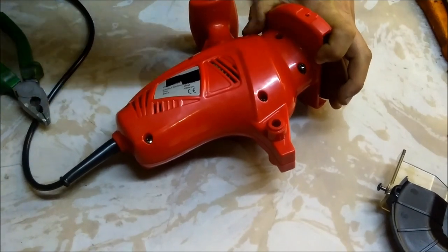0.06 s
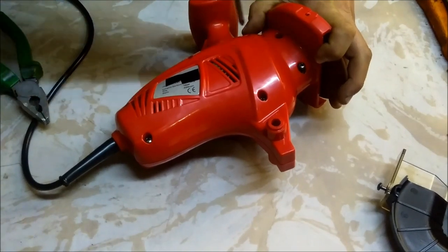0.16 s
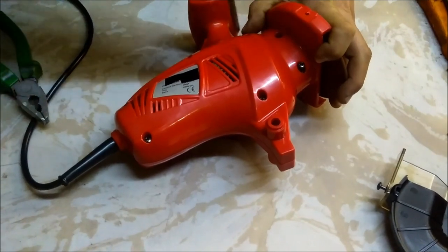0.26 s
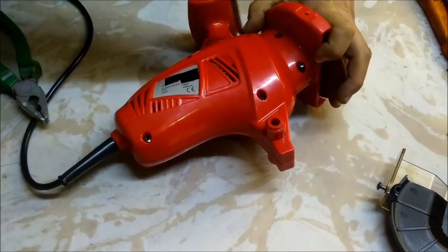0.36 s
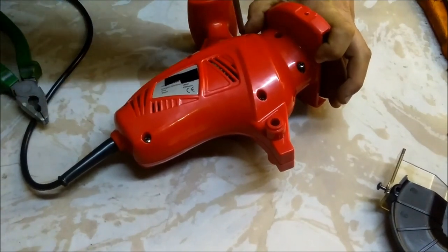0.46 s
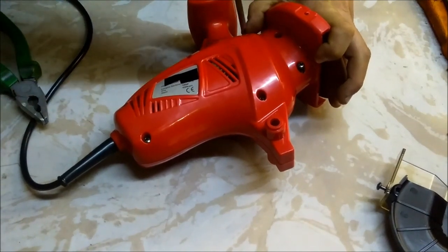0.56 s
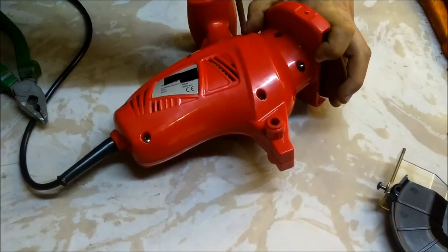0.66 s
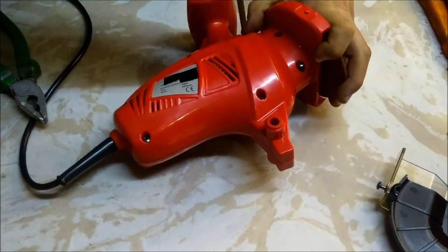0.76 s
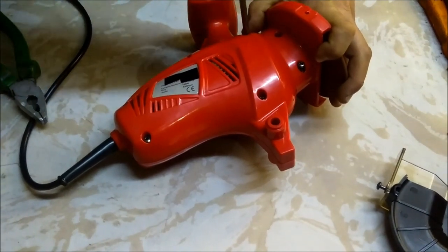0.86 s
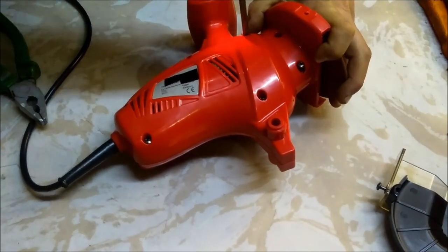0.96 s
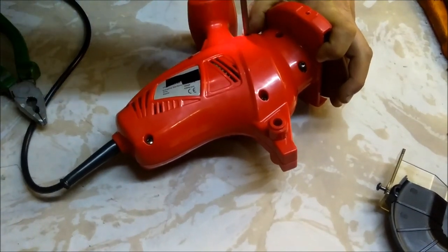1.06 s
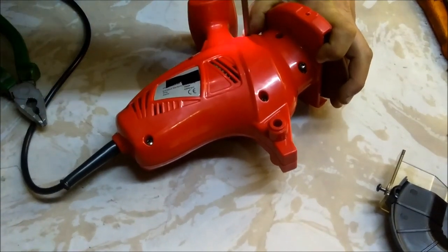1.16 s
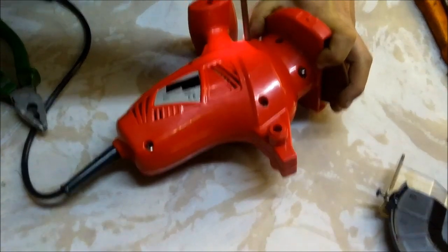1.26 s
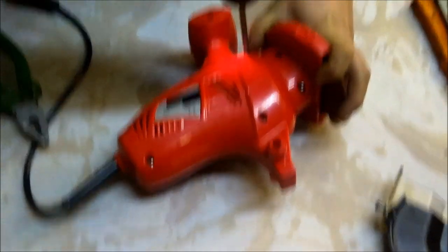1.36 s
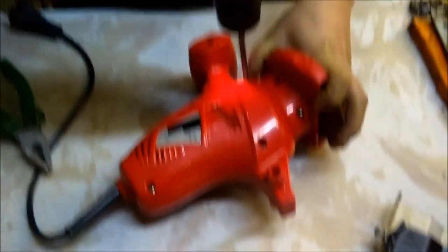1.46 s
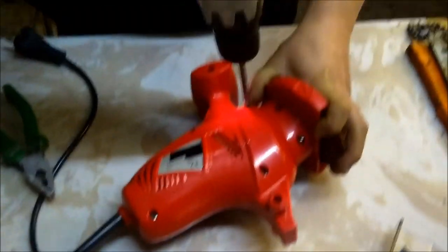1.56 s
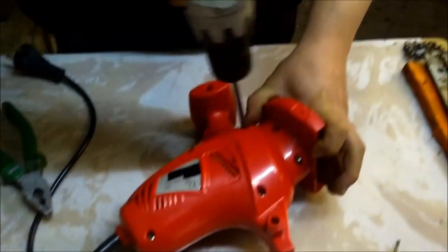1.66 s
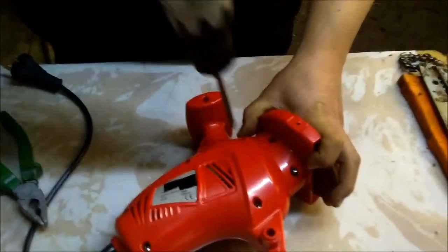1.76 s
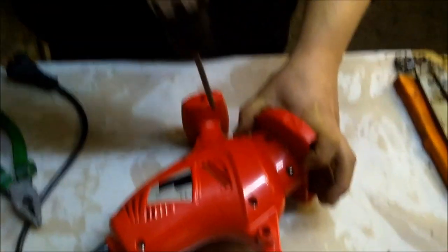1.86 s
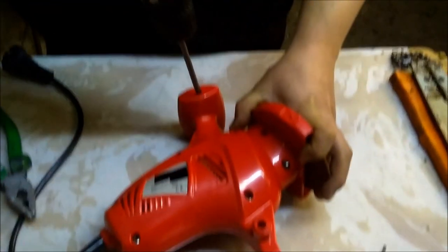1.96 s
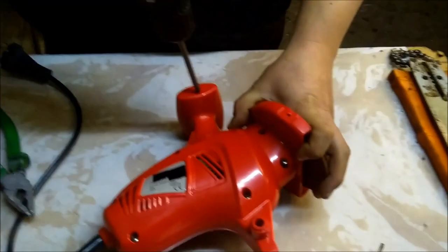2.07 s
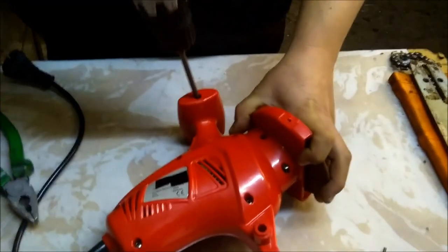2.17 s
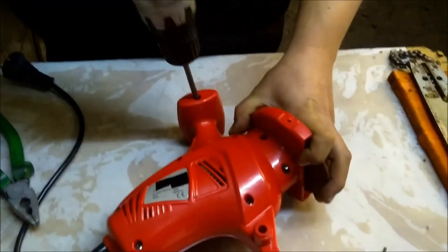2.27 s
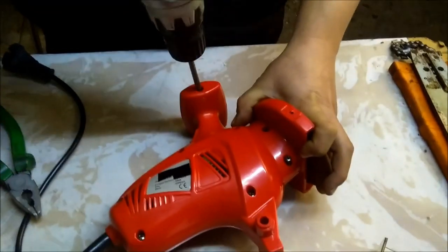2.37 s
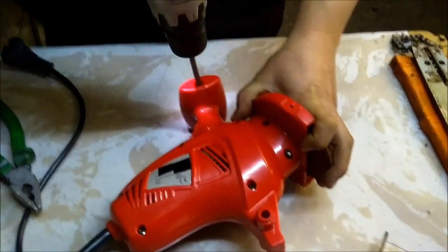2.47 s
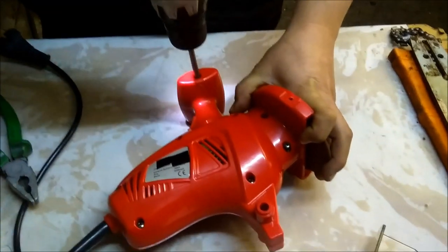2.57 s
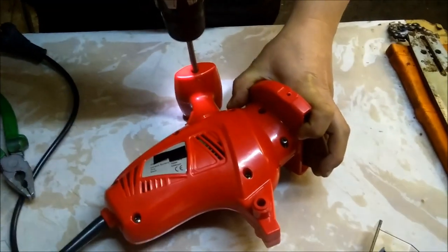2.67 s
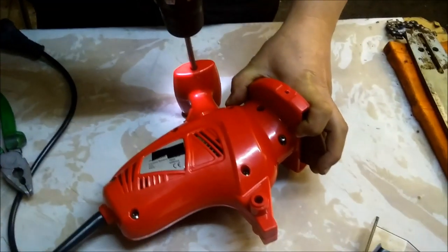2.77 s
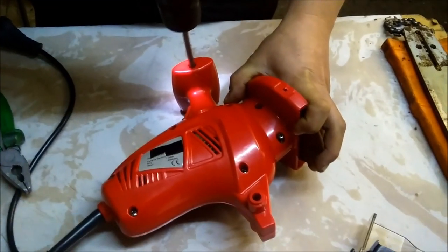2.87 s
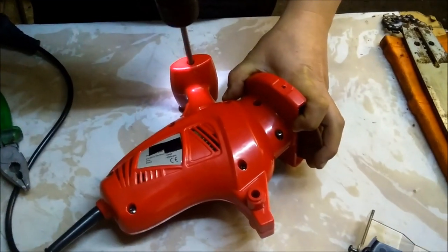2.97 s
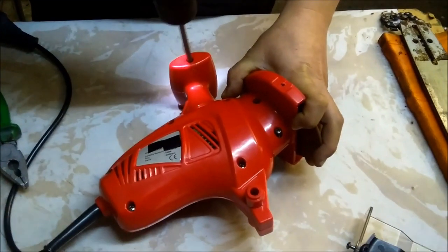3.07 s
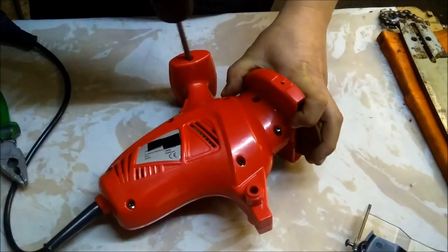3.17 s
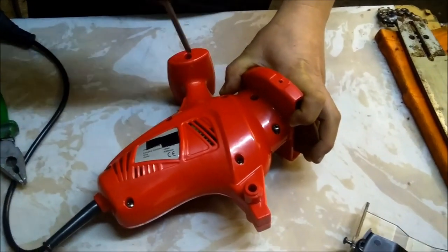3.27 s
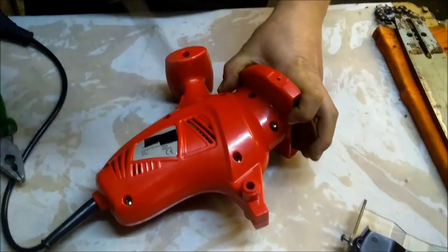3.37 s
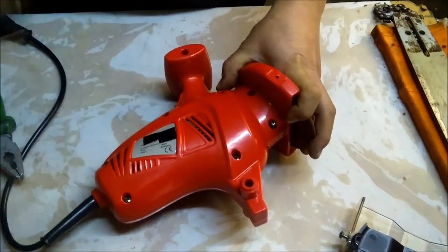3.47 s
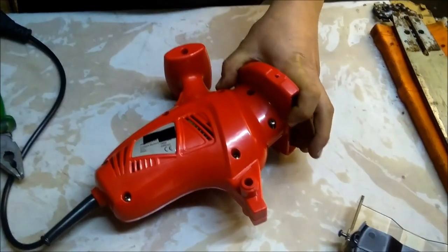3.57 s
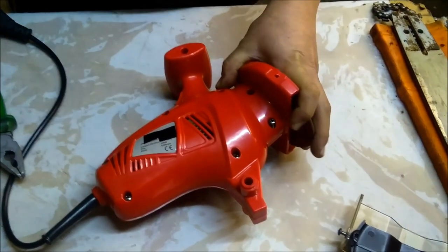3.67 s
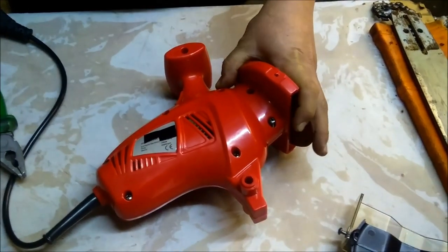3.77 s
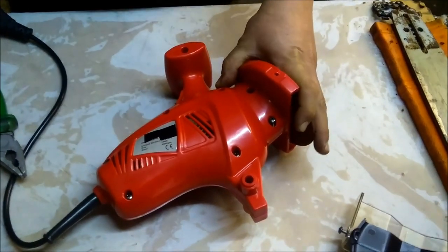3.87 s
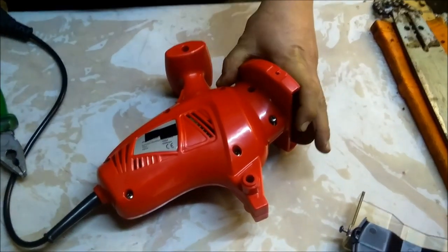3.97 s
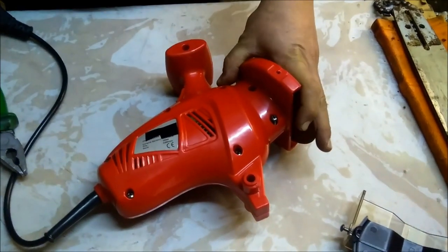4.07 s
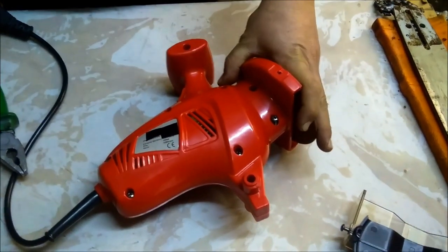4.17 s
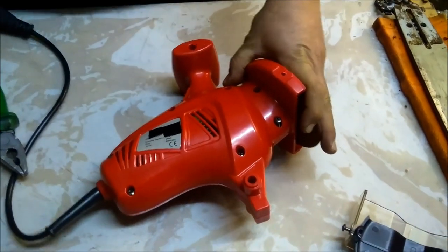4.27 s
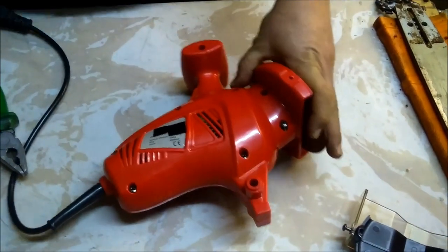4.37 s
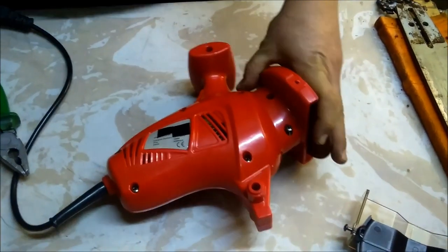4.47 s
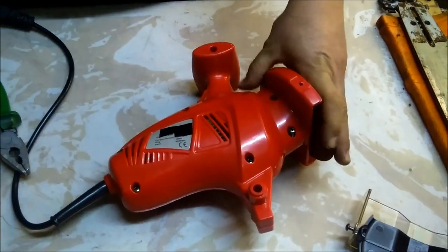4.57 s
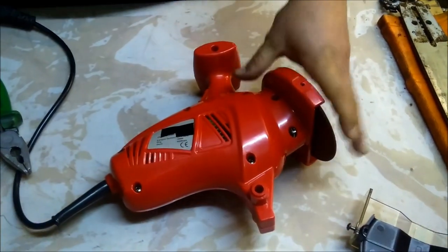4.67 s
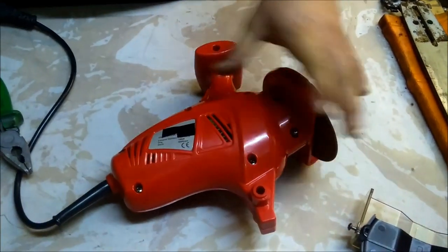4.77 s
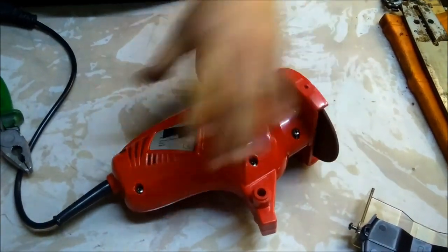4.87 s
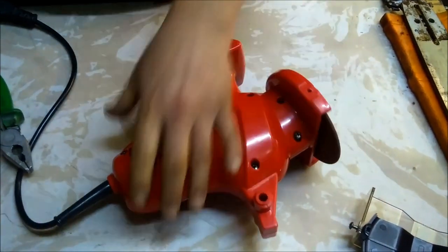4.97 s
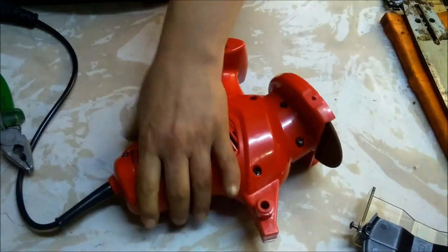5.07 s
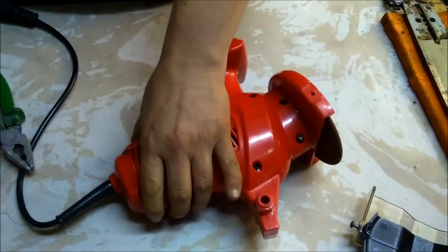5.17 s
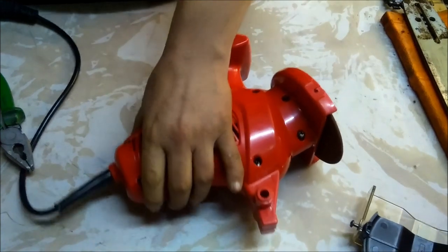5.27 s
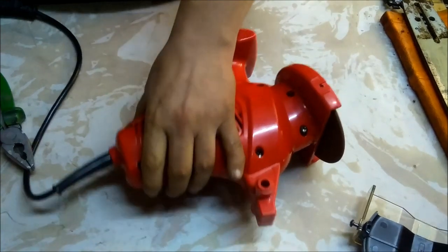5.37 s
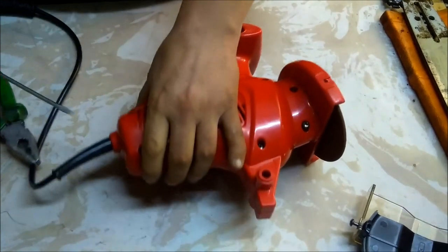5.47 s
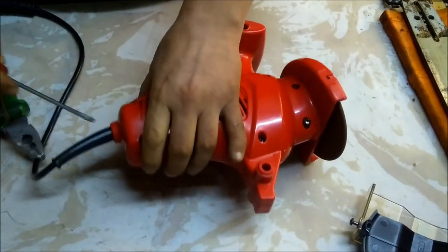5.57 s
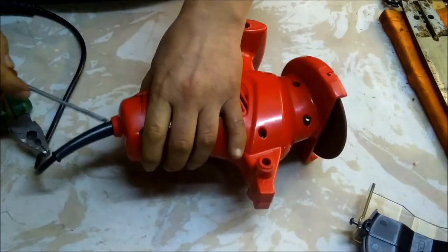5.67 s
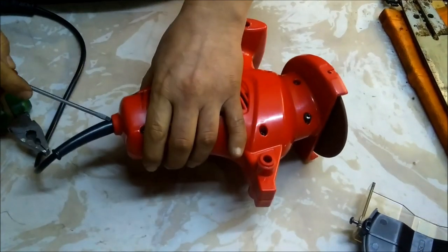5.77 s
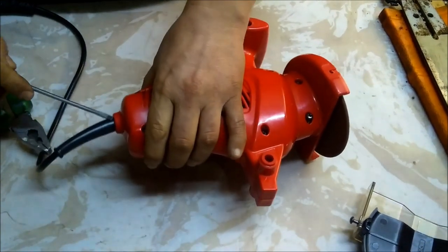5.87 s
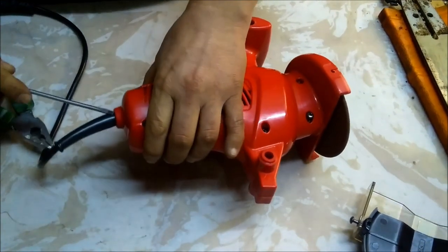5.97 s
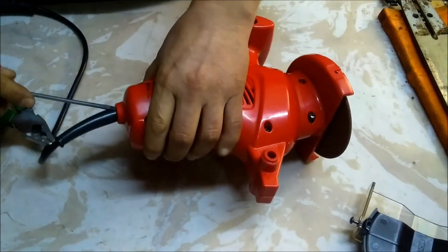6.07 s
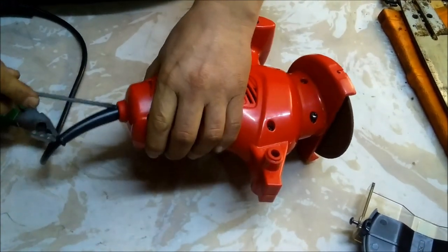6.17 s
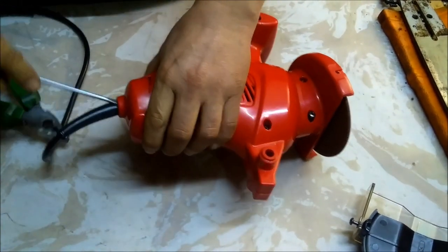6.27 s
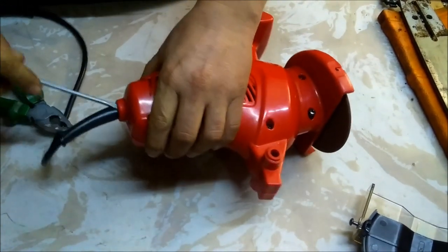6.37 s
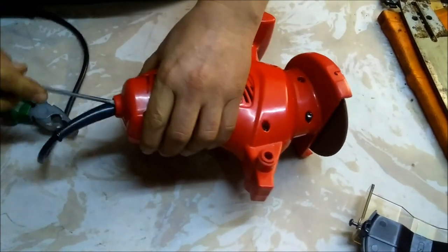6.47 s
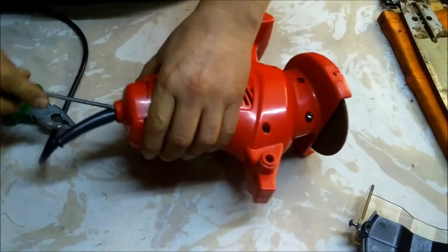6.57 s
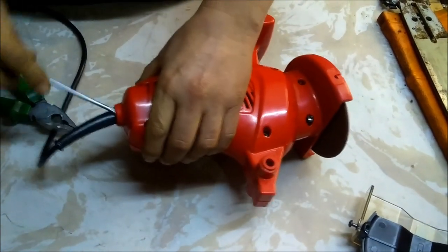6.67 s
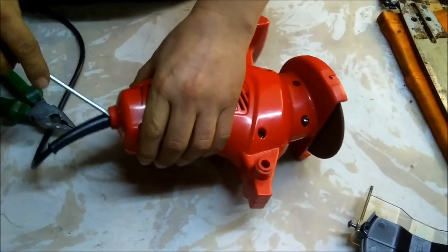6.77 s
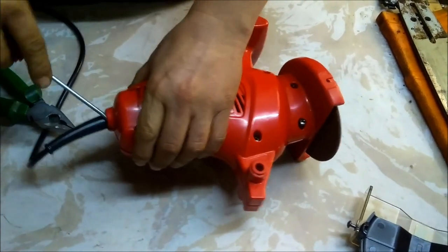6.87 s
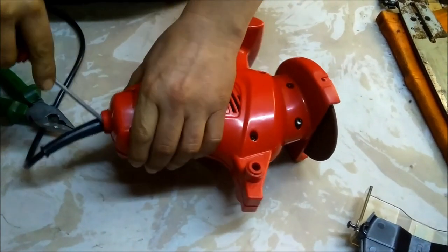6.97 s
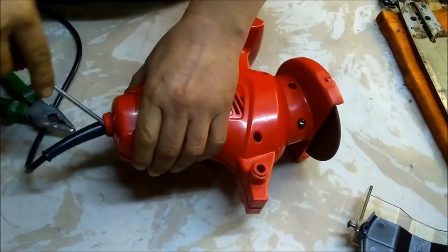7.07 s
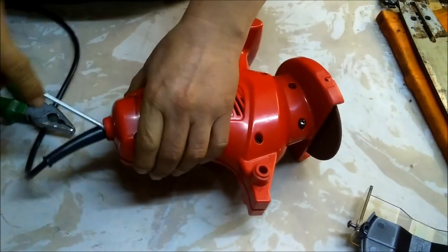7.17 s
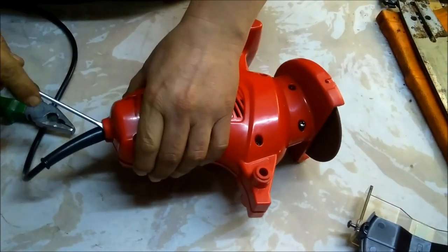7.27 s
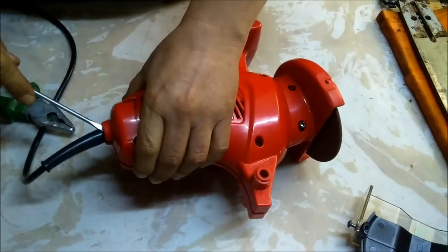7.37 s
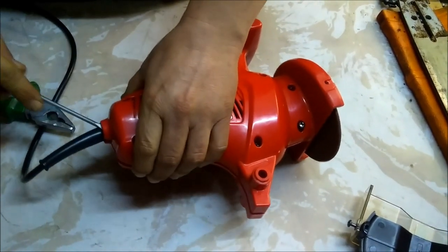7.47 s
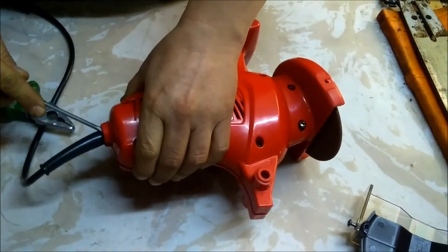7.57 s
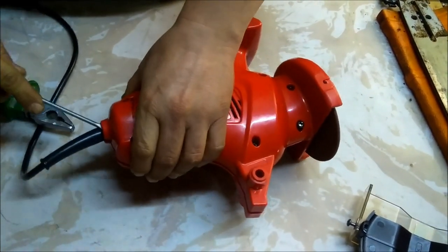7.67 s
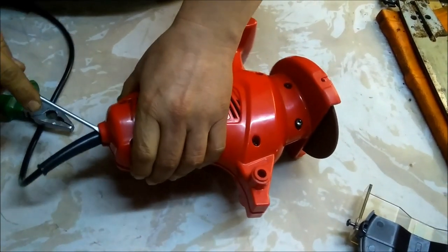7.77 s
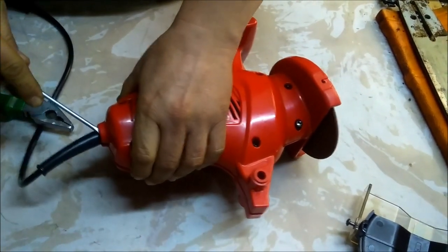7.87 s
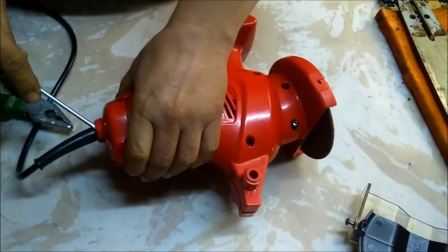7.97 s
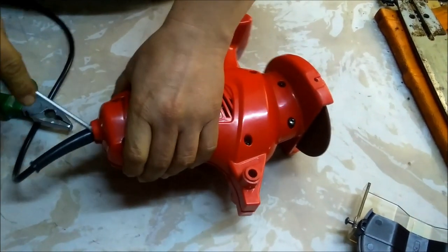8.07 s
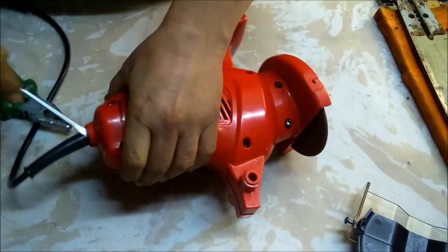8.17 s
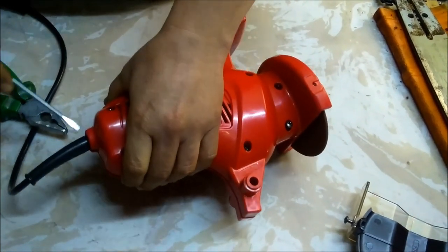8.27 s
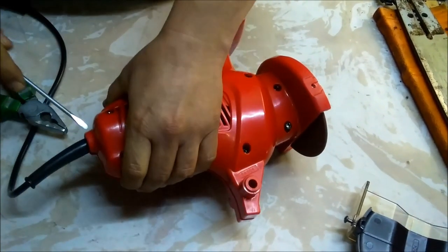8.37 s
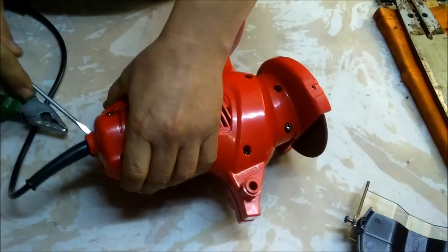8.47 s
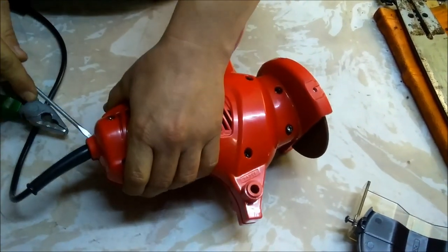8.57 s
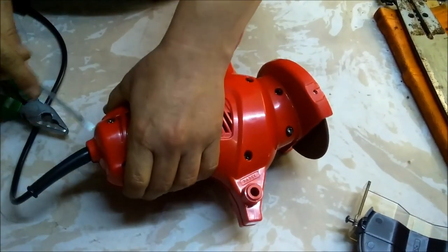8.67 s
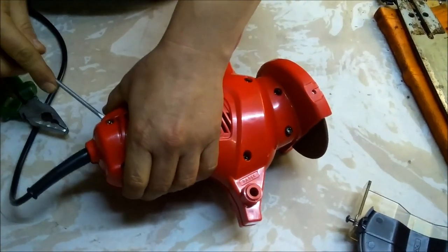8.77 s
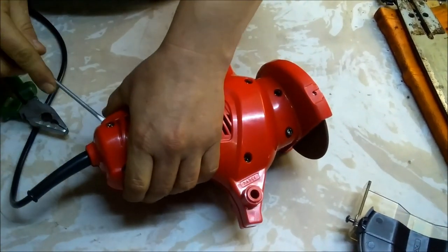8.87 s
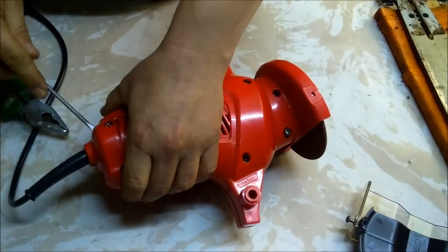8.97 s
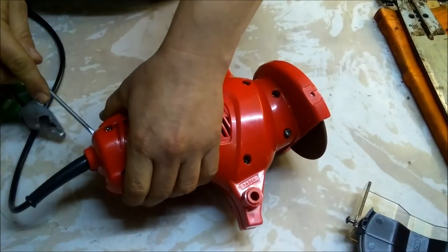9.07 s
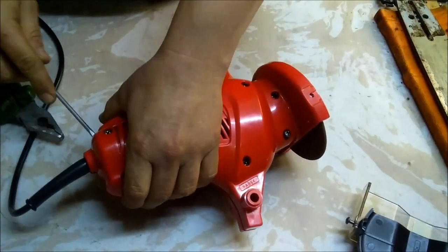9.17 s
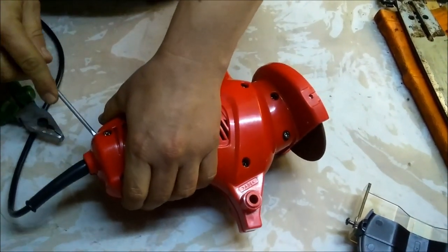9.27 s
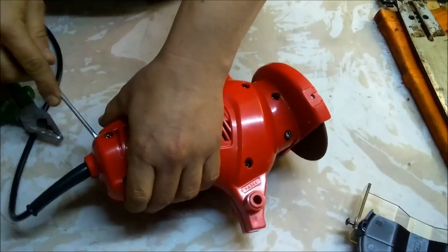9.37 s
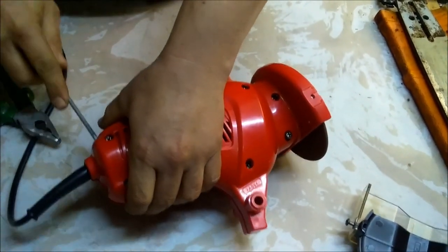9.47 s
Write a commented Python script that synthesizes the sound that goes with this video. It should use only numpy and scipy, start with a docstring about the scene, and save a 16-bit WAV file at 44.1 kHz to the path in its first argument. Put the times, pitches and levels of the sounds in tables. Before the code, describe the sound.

A cordless drill-driver whirs in two short bursts with sharp steel clacks, backing screws from a plastic housing, then faint bench knocks and ticks.

```python
"""Drill-driver at a small workshop bench

A cordless drill-driver backs two screws out of a plastic housing; a run before them is just dying away.
Gear noise, rotor whine and brush sparks follow the motor's speed; each screw brings sharp steel clacks.
Knocks, rocking, rubs and ticks are bursts of noise coloured by steel or plastic, close to the microphone.
It stands on the bench, so thumps reach it through the wood before the air; rumble and hiss lie beneath."""
import sys
import numpy as np
from scipy import signal
from scipy.io import wavfile

SR = 44100
rng = np.random.default_rng(int(sys.argv[2]) if len(sys.argv) > 2 else 0)


def transcribe(u):
    """Save the signal u as a 16-bit wav file named by the first command-line argument.

    u: samples, shape (n,) or (channels, n), limited to [-1, 1]; the rate is SR.
    q: integer samples, one column per channel.
    """
    v = np.clip(np.atleast_2d(u).T, -1, 1)
    q = np.round(v * 32767).astype(np.int16)
    wavfile.write(sys.argv[1], SR, q)


N = 420260  # samples

# runs of the motor: (trigger pulled [s], bit bites [s], screw comes free [s], trigger let go [s],
# top speed [Hz], gear noise [dB], brush sparking [dB], kick into the bench [dB])
MOTOR_RUNS = [(-.6, -.58, -.55, -.079, 360, -31, -30, -25),
              (.998, 1.028, 1.062, 1.681, 364, -27.7, -30.7, -18.5),
              (2.516, 2.526, 2.597, 3.184, 361, -28.7, -31.7, -24)]
# modes of the bench top: (frequency [Hz], level [dB], t60 [s])
BENCH_MODES = [(49, -10.5, .45), (75.7, -13, .18), (114.8, -7.5, 0.2), (160, 0, .16), (189, -1, 0.15),
               (256, -14, .08), (439.5, -18.5, .12), (598, -21.5, .07)]
# spectrum of struck or rubbed plastic: (frequency [Hz], level [dB])
PLASTIC_SPECTRUM = [(250, -10), (620, -2), (950, 1), (1400, 4), (2500, -4), (4000, -8), (8500, -14),
                    (12000, -11.5), (14300, -13), (16000, -29.5)]
# the driver knocks on the housing and is put down: (time [s], level [dB], thump in the bench [dB],
# body [dB], edge [dB], t60 [s], pitch of the struck spot [Hz])
DRIVER_KNOCKS = [(.376, -39.5, -37, 0, -45, .03, 1220), (.688, -41.5, -46, -5, -31, .018, 1420),
                 (.846, -11, -22.5, -9, -15, .011, 1430), (.875, -22, -24.5, 2, -1, .045, 2360),
                 (2.079, -42, -29.5, 11, -20, .049, 606), (2.126, -35.5, -38, 5, -7, .022, 1500),
                 (2.217, -45, -40, 5, -25, .035, 1350), (2.371, -18.5, -22.5, 2, -6, .021, 1170),
                 (2.394, -32, -25, -8, 0, .035, 724), (4.11, -30, -17.5, 3, -31, .045, 613),
                 (4.179, -48, -26.5, 6, -30, .04, 440), (4.253, -25.5, -15.5, 5, -24, .035, 603),
                 (4.28, -29, -24.5, -2, 4, .055, 3280), (4.338, -50, -28.5, 2, -10, .05, 440)]
# the housing rocks on the bench under the hand: (time [s], level [dB], pitch [Hz])
HOUSING_ROCKS = [(3.78, -55, 740), (4.84, -55, 440), (5.105, -50, 700), (5.425, -50.5, 616),
                 (5.577, -55, 616), (6.31, -40.5, 611), (6.463, -53, 715), (6.63, -53, 716),
                 (6.903, -49.5, 616), (7.093, -42.5, 740), (7.541, -47.5, 698), (7.679, -47.5, 730),
                 (7.81, -50, 719), (7.965, -57, 600), (8.13, -44, 717)]


def gain_of(db):
    """Turns decibels into an amplitude factor."""
    return 10 ** (np.asarray(db) / 20)


def evened(x):
    """Scales a sound to rms 1."""
    return x / np.sqrt(np.mean(x ** 2) + 1e-20)


def read(points, hz):
    """Reads a table between its points on a log-frequency axis."""
    f, value = np.transpose(points)
    return np.interp(np.log(hz + 1), np.log(f + 1), value)


def add(mix, s, sound):
    """Mixes a sound in at time s."""
    part = mix[max(round(s * SR), 0):][:len(sound)]
    part += sound[:len(part)]


def colour(x, points, size=4096):
    """Gives a sound the tabled spectrum with a causal, minimum-phase filter."""
    log_gain = np.log(gain_of(read(points, abs(np.fft.fftfreq(size, 1 / SR)))))
    response = np.exp(np.conj(signal.hilbert(log_gain)))
    taps = np.fft.ifft(response).real[:size // 2]
    return signal.oaconvolve(x, taps)[:len(x)]


def wander(t, per_s, count=4096):
    """Drifts between random values of about unit size, per_s of them a second."""
    return np.interp((t - t[0]) * per_s, np.arange(count), rng.standard_normal(count))


def ring(modes, spread_db=0):
    """Sums a struck body's dying modes, their weights randomly varied by spread_db."""
    t = np.arange(SR // 2) / SR
    total = np.zeros(len(t))
    for hz, db, t60 in modes:
        level_db = db + spread_db * rng.standard_normal()
        total += gain_of(level_db - 60 * t / t60) * np.sin(2 * np.pi * hz * t)
    return total


def resonate(x, hz, width_hz):
    """Passes a sound through one resonance with a peak gain of 1."""
    return signal.lfilter(*signal.iirpeak(hz, hz / width_hz, SR), x)


def drive(t, trigger, bite, free, release, top_hz, gear_db, spark_db):
    """The motor labours on the tight screw, spins up once it is free and is braked: speed and two levels."""
    catch_hz, free_hz = 164, 205  # rotor speed as the motor catches, and as the screw lets go
    spin_up_s, brake_s, spark_off_s = .115, .047, .022  # time constants; the last is the brake current's
    freed = np.clip(t - free, 0, release - free)
    braked = np.maximum(t - release, 0)
    labour_hz = np.interp(t, [trigger, free], [catch_hz, free_hz])
    strain = np.exp(-freed / spin_up_s)
    rotor_hz = (top_hz + (labour_hz - top_hz) * strain) * np.exp(-braked / brake_s)
    slack_db = -9 * (t < bite)  # quieter before the bit bites
    speed_db = 18 * np.log10(rotor_hz / top_hz + 1e-12)
    # the brake throws the gear teeth onto their other flanks, with a short bark
    bark_db, bark_s = 4.5, .02
    flank_db = bark_db * braked / bark_s * np.exp(1 - braked / bark_s)
    # both levels ease, in dB per second, as the thread runs out
    gear_level_db = gear_db + slack_db + speed_db + flank_db - 3.8 * freed
    current_db = strain - 7.5 * freed  # 1 dB of extra sparking under full load
    current_db -= 20 / np.log(10) * braked / spark_off_s
    return rotor_hz, gear_level_db, spark_db + slack_db + current_db


def motor(t, run, wobble=.09, grain_db=6.8, chop=0.56, mesh_db=0, whine_db=3.2, jitter=.004, flutter=.45,
          pole_db=-21, shell_hz=620, shell_width_hz=90, shell_db=5.5, shake_db=-9, stop_hz=25):
    """One run: gears, whine and sparks in the air, and the pole hum and shake that go into the bench."""
    # whine of rotor and gears: (multiple of rotor speed [1], relative level [dB])
    whine_orders = [(1.67, -30.5), (2.09, -24.5), (3.78, -17), (4.14, -21.5), (6, -14.5), (7.35, -20),
                    (8.28, -21), (9, -13), (9.33, -13), (10.25, -24.5)]
    # spectrum of the gearbox: (frequency [Hz], level [dB])
    gearbox_spectrum = [(200, -25), (430, -11.5), (510, -25), (610, -8), (680, -12.5), (760, -4),
                        (900, -8.5), (1300, -1), (1700, -7), (2200, -3), (3200, -3), (4500, -4),
                        (7000, -8.5), (9000, -11), (15000, -33.5)]
    # spectrum of the brush sparks: (frequency [Hz], level [dB])
    spark_spectrum = [(1000, -28.5), (4500, -6.5), (6500, -13), (8700, -24.5), (10500, 2), (11600, 2.5),
                      (13000, -5), (14300, -8), (15200, -28)]
    # gear stages: (turns of the rotor after which the tooth pattern repeats [1])
    stage_periods = [2.39, 3.7, 5.3]
    gear_ratio = 18.6  # rotor turns to one turn of the chuck

    rotor_hz, gear_db, spark_db = drive(t, *run)
    running = (t >= run[0]) * np.clip(rotor_hz / stop_hz - 1, 0, 2) / 2
    turns = np.cumsum(rotor_hz * (1 + jitter * wander(t, 70))) / SR
    angle = 2 * np.pi * turns
    # the load swells once per turn of the chuck
    load = running * (1 + wobble * np.sin(angle / gear_ratio))

    # loose teeth strike unevenly, in step with the rotor
    grain = rng.standard_normal(len(t)) * gain_of(grain_db * wander(t, 900))
    teeth = grain * (1 + chop * np.cos(angle))
    rattle = evened(colour(teeth, gearbox_spectrum))

    # each gear stage repeats its own tooth errors: a thicket of partials that glides with the speed
    mesh = np.zeros(len(t))
    for period in stage_periods:
        errors = rng.standard_normal(round(36 * period))
        place = (turns + 0.014 * wander(t, 60)) / period
        pattern = np.interp(place, np.arange(len(errors)) / len(errors), errors, period=1)
        mesh += pattern * (1 + flutter * wander(t, 25))
    gears = evened(rattle + gain_of(mesh_db) * evened(colour(mesh, gearbox_spectrum)))

    whine = np.zeros(len(t))
    for multiple, db in whine_orders:
        strength = gain_of(db) * (1 + flutter * wander(t, 30))
        whine += strength * np.sin(multiple * angle + .9 * wander(t, 50))

    # the three rotor poles hum, and boom as they sweep through the shell's resonance
    poles = np.sin(3 * angle + .3 * wander(t, 60)) * running * gain_of(gear_db)
    boom = resonate(resonate(poles, shell_hz, shell_width_hz), shell_hz, shell_width_hz)
    hum = gain_of(pole_db) * poles * (1 + flutter * wander(t, 40)) + gain_of(shell_db) * boom

    # the brushes spark at each commutator gap, six to the turn
    gaps = 1 + chop * np.cos(6 * angle)
    crackle = rng.standard_normal(len(t)) * gaps * gain_of(3 * wander(t, 1000))
    sparks = evened(colour(crackle, spark_spectrum))

    air = load * (gain_of(gear_db) * (gears + gain_of(whine_db) * whine) + gain_of(spark_db) * sparks)
    shake = evened(signal.oaconvolve(rng.standard_normal(len(t)), ring(BENCH_MODES))[:len(t)])
    return air, hum + shake * load * gain_of(gear_db + shake_db)


def background(apart_hz=450):
    """Workshop rumble shared by both microphone ports, with thin air noise and hiss that differ between them."""
    # spectrum of the workshop's noise: (frequency [Hz], level [dB])
    floor_spectrum = [(12, -23.5), (24, 1), (42, 5), (66, -3), (139, -10), (205, -14.5), (337, -20),
                      (390, -18), (555, -27), (610, -28.5), (700, -29.5), (1500, -39.5), (2700, -38),
                      (4500, -49.5), (9000, -53), (13400, -46.5), (15000, -56.5)]
    # spectrum of the hiss: (frequency [Hz], level [dB])
    hiss_spectrum = [(300, -5), (750, 5), (2500, 1.5), (3900, 1.5), (5200, -4), (7000, -9.5), (9500, -12.5),
                     (12000, -4.5), (14500, -10)]
    # a faint hiss swells around each screw's run: (start [s], start of fading [s], level [dB])
    hiss_swells = [(.4, 1.5, -68), (2.03, 2.95, -53.5)]
    rise_s, fade_db_per_s, bed_db = .15, 25, -76.3  # of the hiss

    t = np.arange(N) / SR
    shared, left, right = rng.standard_normal((3, N))
    low, high = (signal.butter(2, apart_hz, kind, fs=SR) for kind in ("low", "high"))
    bass = evened(colour(signal.lfilter(*low, shared), floor_spectrum))
    rumble = bass * gain_of(-56 + 1.3 * wander(t, 3))  # drifts slowly
    scale = np.std(colour(shared, floor_spectrum))
    air = np.array([colour(signal.lfilter(*high, side), floor_spectrum) for side in (left, right)]) / scale
    hiss = np.array([evened(colour(side, hiss_spectrum)) for side in rng.standard_normal((2, N))])
    swells = np.zeros(N)
    for start, fade, db in hiss_swells:
        rise = np.clip((t - start) / rise_s, 0, 1)
        swells += rise * gain_of(db - fade_db_per_s * np.maximum(t - fade, 0))
    return rumble + air * gain_of(-52.5) + hiss * np.hypot(gain_of(bed_db), swells)


def thumps(rise_s=0.003):
    """Knocks, the rocking housing and the kick of each start ring the bench top under the microphone."""
    bench_lead_s = .006  # the bench carries a blow to the microphone this much before the air
    out = np.zeros(N)
    swell = 1 - np.exp(-np.arange(SR // 2) / SR / rise_s)  # the heavy top takes a moment to get moving
    blows = [(s - bench_lead_s, db) for s, _, db, *_ in DRIVER_KNOCKS]
    blows += [(s - bench_lead_s, db + 1.5) for s, db, _ in HOUSING_ROCKS]
    blows += [(bite, db) for _, bite, *_, db in MOTOR_RUNS if bite > 0]
    for s, db in blows:
        thud = ring(BENCH_MODES, spread_db=1.2) * swell
        add(out, s, gain_of(db) * thud / abs(thud).max())
    return out


def strike(db, body_db, edge_db, t60, material, crack_db):
    """A dying burst of contact noise with one sharp crack, coloured by material and hardness."""
    t = np.arange(SR // 4) / SR
    decay_s = max(t60, .003)
    burst = rng.standard_normal(len(t)) * gain_of(-60 * t / decay_s)
    burst *= np.sqrt(decay_s * SR / np.log(1e6)) / np.linalg.norm(burst)  # starts near rms 1
    burst[round(.002 * SR)] += gain_of(crack_db) * np.sqrt(np.sum(burst ** 2) / 2)  # as the faces meet
    # soft blows have more body, hard ones more edge
    hz = np.geomspace(100, 16000, 60)
    hardness = [(800, body_db), (1600, 0), (3500, 0), (11000, edge_db)]
    shape_db = read(material, hz) + read(hardness, hz)
    power = np.sum(gain_of(shape_db) ** 2 * np.gradient(hz)) / (SR / 2)
    return gain_of(db) * colour(burst, np.c_[hz, shape_db]) / np.sqrt(power)


def tap(db, body_db, edge_db, t60, spot_hz, crack_db, spot_width_hz=320, spot_db=0):
    """A blow on plastic that rings the struck spot."""
    blow = strike(db, body_db, edge_db, t60, PLASTIC_SPECTRUM, crack_db)
    return blow + gain_of(spot_db) * resonate(blow, spot_hz, spot_width_hz)


def contacts():
    """Noise bursts: steel clacks, knocks of the driver, dull rocking of the housing and light ticks."""
    # clacks of the driver's chuck and clutch:
    # (time [s], level [dB], body below 800 Hz [dB], edge above 11 kHz [dB])
    steel_clacks = [(1.034, -2.5, -12, 0), (1.044, -11, 0, -11), (1.93, -38.5, -18, -20),
                    (2.519, -13, -12, -12), (2.538, -1.5, -23, 3), (3.285, -35.5, -2, 3),
                    (3.461, -45, -11, -22)]
    # spectrum of struck steel: (frequency [Hz], level [dB])
    steel_spectrum = [(250, -18), (600, 16), (1400, 6), (2500, -10), (5000, -2.5), (8500, -9), (11500, 8.5),
                      (14000, -1), (16000, -11)]
    # fingernails and the screwdriver's tip: (time [s], level [dB], edge [dB], pitch of the touched spot [Hz])
    light_ticks = [(4.732, -48.5, -11, 2200), (5.126, -48.5, -21, 3540), (5.774, -54.5, -21, 1913),
                   (6.486, -47, -30, 2176), (6.984, -35.5, 15, 4420), (7.024, -47, 10, 2810),
                   (7.335, -34.5, -15, 2620), (8.24, -54, -20, 2500), (8.543, -48, -19, 1180),
                   (8.724, -48, -9, 848), (8.752, -46, -27, 2000), (8.794, -50, -27, 1180),
                   (9.013, -51, -28, 2100), (9.064, -40.5, -10, 1206), (9.296, -44, -19, 2610)]
    out = np.zeros(N)
    for s, db, _, *blow in DRIVER_KNOCKS:
        add(out, s, tap(db, *blow, crack_db=-4, spot_width_hz=320, spot_db=1))
    for s, db, body_db, edge_db in steel_clacks:
        add(out, s, strike(db, body_db, edge_db, .009, steel_spectrum, crack_db=1))
    # every rock is the same dull, hollow kind of blow
    for s, db, spot_hz in HOUSING_ROCKS:
        add(out, s, tap(db, 7.5, -23, .03, spot_hz, crack_db=-9, spot_width_hz=220, spot_db=6.5))
    for s, db, edge_db, spot_hz in light_ticks:
        add(out, s, tap(db, -7, edge_db, .027, spot_hz, crack_db=-4))
    return out


def handling(spot_width_hz=600, spot_db=5, spread_db=4):
    """Gritty noise of sliding strokes on the plastic, and light touches at random moments."""
    # tool tip and hand sliding: (start [s], length [s], level [dB], pitch of the rubbed spot [Hz])
    rub_strokes = [(.765, .09, -51.5, 1600), (.89, .14, -53, 2200), (2.21, .03, -52, 1700),
                   (2.27, .1, -58, 1304), (4.115, .33, -53.5, 2200), (4.687, .098, -64.5, 2120),
                   (5.022, .13, -64, 702), (6.25, .7, -71, 680), (7.5, .36, -72, 642),
                   (8.19, .1, -69, 2600), (8.744, .1, -67, 2500), (8.94, .08, -66, 2400)]
    first_s, last_s, touch_count = 4.8, 9.5, 12  # span and number of the light touches
    touch_db, lowest_hz = -65, 600
    out, t = np.zeros(N), np.arange(SR) / SR
    for s, length, db, spot_hz in rub_strokes:
        grit = colour(rng.standard_normal(SR) * gain_of(4.5 * wander(t, 250)), PLASTIC_SPECTRUM)
        grit = evened(grit + gain_of(spot_db) * resonate(grit, spot_hz, spot_width_hz))
        stroke = np.sqrt(np.sin(np.pi * np.clip(t / length, 0, 1)) + 1e-12)
        add(out, s, gain_of(db) * grit * stroke)
    for when, force, place in rng.random((touch_count, 3)):
        level_db = touch_db + spread_db * (2 * force - 1)
        spot_hz = lowest_hz * (1 + 2 * place)
        touch = tap(level_db, body_db=3, edge_db=-20, t60=.04, spot_hz=spot_hz, crack_db=-6)
        add(out, first_s + when * (last_s - first_s), touch)
    return out


def reflections(near_db, near_t60, room_db):
    """One pair of paths: sparse quick echoes off bench and tools, and the room's noise-like tail."""
    # decay of the room: (frequency [Hz], t60 [s])
    room_decay = [(150, .35), (700, 0.53), (2500, 0.41), (7000, 0.42), (14000, 0.34)]
    size = SR * 3 // 4
    t = np.arange(size) / SR
    echoes = rng.standard_normal((2, size)) * (rng.random((2, size)) < .1)
    near = echoes * gain_of(-60 * t / near_t60) * (t > .001)
    # each band of the tail dies at its own rate
    hz, frame_t, bands = signal.stft(rng.standard_normal((2, size)) * (t > .008), SR, nperseg=256)
    dying = bands * gain_of(-60 * frame_t / read(room_decay, hz)[:, None])
    tail = signal.istft(dying, SR, nperseg=256)[1][:, :size]
    paths = ((near_db, near), (room_db, tail))
    return sum(gain_of(db) * p / np.linalg.norm(p, axis=1, keepdims=True) for db, p in paths)


def workshop(x, direct_db, near_db, near_t60, room_db, sway_per_s=7):
    """Direct sound at two microphone ports, and reflections that keep changing as the hands move."""
    # balance of the ports: (frequency [Hz], left minus right [dB])
    port_balance = [(200, -4.5), (700, -2.3), (1400, -0.5), (2500, -7.5), (5000, -5), (9000, 0),
                    (15000, -4.5)]
    right_lead_s = .00032  # the direct sound reaches the right port first
    delayed = np.pad(x, (round(right_lead_s * SR), 0))[:len(x)]
    ports = gain_of(direct_db) * np.array([delayed, x])
    # three sets of paths take turns, their total power constant
    sway = np.pi * sway_per_s * np.arange(len(x)) / SR
    for k in range(3):
        share = np.cos(sway + k * np.pi / 3) * np.sqrt(2 / 3)
        paths = reflections(near_db, near_t60, room_db)
        ports += signal.oaconvolve((x * share)[None], paths, axes=1)[:, :len(x)]
    sides = zip(ports, (.5, -.5))
    return np.array([colour(port, [(f, side * db) for f, db in port_balance]) for port, side in sides])


def scene(thump_air_db=-13):
    """Airborne sound through the room, plus what the bench carries straight to the microphone."""
    whir, shakes = np.zeros((2, SR + N))  # starts one second early: the first run is just dying away
    for *run, _ in MOTOR_RUNS:
        air, shake = motor(run[0] + np.arange(SR) / SR, run)
        add(whir, 1 + run[0], air)
        add(shakes, 1 + run[0], shake)
    bench = thumps()
    near_sounds = contacts() + handling() + gain_of(thump_air_db) * bench
    # the motor is held high and fills the room; the contacts are low and close
    driver = workshop(whir, direct_db=-4.5, near_db=-4, near_t60=0.085, room_db=-9)[:, SR:]
    clicks = workshop(near_sounds, direct_db=-1, near_db=-5.5, near_t60=0.062, room_db=-13.5)
    beneath = bench * gain_of(-2) + shakes[SR:] + background()
    return driver + clicks + beneath * gain_of([[-.65], [.65]])  # left a little softer than right


def record(dry, edge_hz=14750):
    """Holds the peaks within 0.8, then cuts the treble above the band edge."""
    limited = np.clip(dry, -.8, .8)
    band = signal.firwin(301, edge_hz, window=("kaiser", 9), fs=SR)
    return signal.oaconvolve(limited, band[None], "same")


dry = scene()
out = record(dry)
transcribe(out)
```